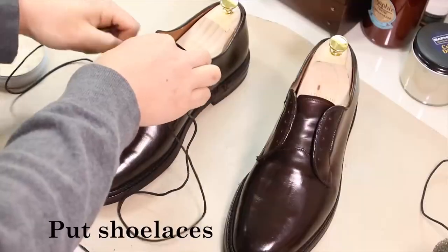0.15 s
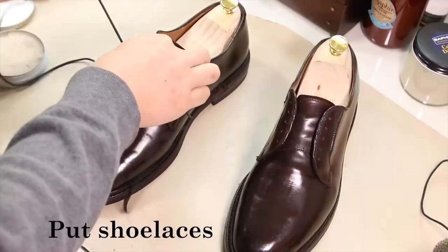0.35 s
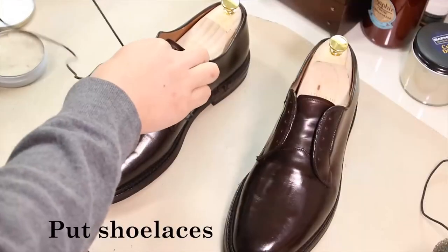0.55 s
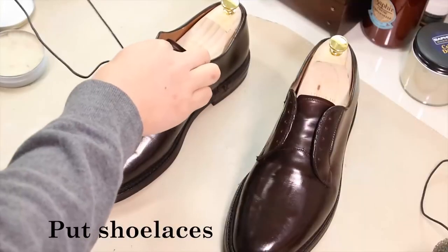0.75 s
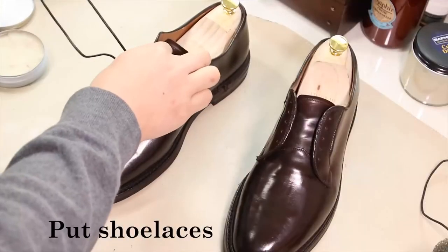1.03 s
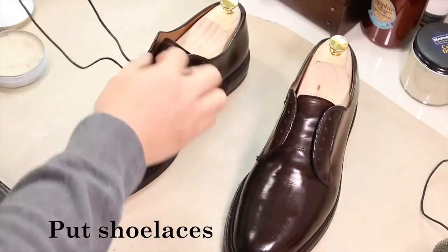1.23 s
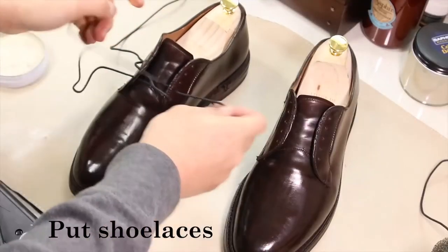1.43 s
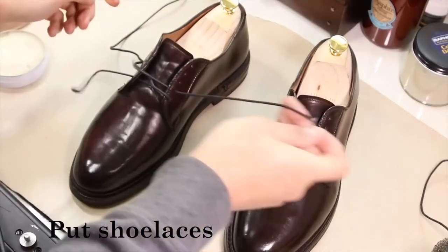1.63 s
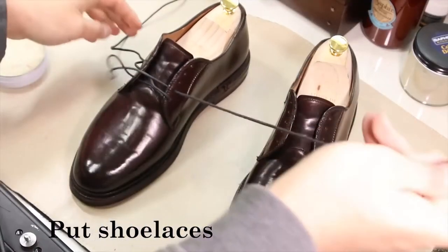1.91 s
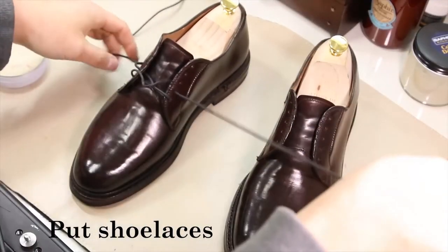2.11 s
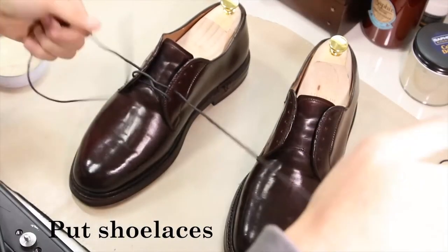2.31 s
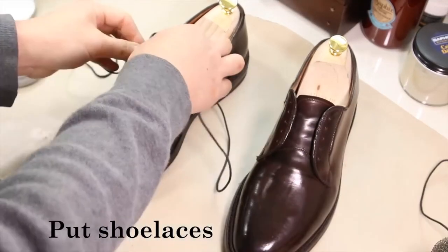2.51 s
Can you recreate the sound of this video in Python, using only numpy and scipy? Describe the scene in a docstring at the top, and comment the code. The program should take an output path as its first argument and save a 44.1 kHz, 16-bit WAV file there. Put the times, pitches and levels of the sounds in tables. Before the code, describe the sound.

A shoelace hisses through the eyelets of a leather shoe in two long pulls.

```python
"""A shoelace drawn through the eyelets of a leather shoe in two long pulls, close to a stereo pair.
The braid hisses over the eyelet's edge and its small slips make the leather ring; now and then it snags.
The hard lace tips tick, and after the second pull the slack lace rustles through the fingers.
The shoe shudders on a table near the microphones, in a small room with a faint steady background."""
import sys
import numpy as np
from scipy import signal
from scipy.fft import rfft, irfft
from scipy.io import wavfile

SR = 44100
rng = np.random.default_rng(int(sys.argv[2]) if len(sys.argv) > 2 else 0)


def generate_wav(sig):
    """Save sig (samples, or channels by samples) to the path in sys.argv[1] as 16-bit PCM at SR."""
    pcm = np.round(np.clip(np.atleast_2d(sig).T, -1, 1) * 32767).astype(np.int16)
    wavfile.write(sys.argv[1], SR, pcm)


N = 116865
T, HZ = np.arange(N) / SR, np.fft.rfftfreq(2 * N, 1 / SR)


def amp(db):
    """Decibels to gain."""
    return 10 ** (np.asarray(db) / 20)


def unit(x):
    """Scales to rms 1."""
    return x / np.sqrt(np.mean(x ** 2) + 1e-20)


def spectrum(points):
    """Spreads a table over all frequencies, on a log axis."""
    hz, value = np.transpose(points)
    return np.interp(np.log(HZ + 1), np.log(hz + 1), value)


def envelope(rows, column=1):
    """One dB column as a gain over time, silent outside the table."""
    rows = np.array(rows)
    return amp(np.interp(T, rows[:, 0], rows[:, column], left=-120, right=-120))


def swell(centre_s, length_s):
    """A smooth bump in time."""
    return np.exp(-(2 * (T - centre_s) / length_s) ** 2)


def causal(db):
    """The response with this gain that rings only after its cause."""
    log_gain = np.log(amp(np.maximum(db, db.max() - 100)))
    cepstrum = irfft(log_gain)
    cepstrum[1:N] *= 2
    cepstrum[N + 1:] = 0
    return np.exp(rfft(cepstrum))


def through(x, response):
    """Filters x by a frequency response."""
    return irfft(rfft(x, 2 * N) * response)[..., :N]


# How alike the two microphones hear the shoe: freq_hz, coherence (0-1)
MIC_LIKENESS = [(500, 0.4), (1400, 0.4), (9000, 0.022)]

def at_mics(pair, side_db, lead_rad=0):
    """Blends two signals into a partly alike stereo pair; side_db is always left minus right."""
    a, b = rfft(pair, 2 * N)
    alike = np.clip(spectrum(MIC_LIKENESS), 0, 1)
    right = alike * a * np.exp(-1j * lead_rad) + np.sqrt(1 - alike ** 2) * b
    return irfft(np.array([a * amp(side_db / 2), right * amp(-side_db / 2)]))[:, :N]


def steady_noise(colour, side_db):
    """Coloured noise at both microphones, rms 1."""
    noise = through(rng.standard_normal((2, N)), amp(spectrum(colour)))
    return unit(at_mics(noise, side_db))


# Colour of the background: freq_hz, level_db
BACKGROUND_COLOUR = [(40, -16.5), (330, -6), (2700, -23.5), (15000, -39.5)]

def background():
    """A faint, dull, even noise behind everything."""
    return amp(-45.5) * steady_noise(BACKGROUND_COLOUR, side_db=2)


def room(x, t60_s=0.22, level_db=-10.5):
    """The short tail of a small room, reaching the microphones 4 ms after the direct sound."""
    t = T[:SR // 2]
    echoes = rng.standard_normal((2, len(t))) * (t > .004) * amp(-60 * t / t60_s)
    return amp(level_db) * signal.fftconvolve(x, echoes / np.linalg.norm(echoes[0]), axes=1)[:, :N]


# Colour of the shoe's shudder on the table: freq_hz, level_db
SHUDDER_COLOUR = [(28, -54), (72, 4), (115, -9), (148, 9.5), (200, -18)]

def table_shudder():
    """The shoe rumbles on the table, following the leather body of each pull and tug."""
    drive = amp(-13.5) * (envelope(FIRST_PULL) + envelope(HAND_TUGS)) + amp(-22.5) * envelope(SECOND_PULL)
    return drive * steady_noise(SHUDDER_COLOUR, side_db=4.5)


# Narrow resonances of the shoe: freq_hz, lift_db
SHOE_MODES = [(2115, 3), (2800, 3.5), (4950, 4.5), (7400, 5.5), (8650, 6)]

def leather(colour, q=17):
    """A broad colour with the shoe's resonances on top, in dB."""
    return spectrum(colour) + sum(db / (1 + (2 * q * (HZ / hz - 1)) ** 2) for hz, db in SHOE_MODES)


def slips(per_s, spread_db=1.8):
    """Tiny releases of the braid at random moments, a few of them large."""
    size = amp(spread_db * np.minimum(rng.exponential(1, N), 4))
    released = rng.random(N) < per_s / SR
    return size * released * rng.choice([-1., 1.], (2, N))


# The lace is taken up between the pulls; the hand lands on the shoe at the end: time_s, level_db
HAND_TUGS = [(1.228, -34), (1.236, -31), (1.272, -26), (1.292, -42.5), (1.325, -65), (1.342, -40.5),
             (1.37, -41.5), (2.6, -60), (2.628, -36.5), (2.65, -65)]
# Slack lace slides through the fingers: time_s, level_db
SLACK_SLIDE = [(2.22, -33), (2.255, -22), (2.285, -37), (2.345, -19.5), (2.39, -27.5), (2.47, -41.5),
               (2.6, -42)]
# Colour of that slide: freq_hz, level_db
SLACK_COLOUR = [(200, -10.5), (600, 0), (1000, -7.5), (2600, -4), (12000, -20.5)]

def handling():
    """Lace, fingers and leather rub lightly, a little left of centre."""
    tugs = at_mics(through(slips(per_s=2500), causal(leather(SECOND_COLOUR))), side_db=2.5)
    slide = at_mics(through(slips(per_s=7800), causal(spectrum(SLACK_COLOUR))), side_db=3.5)
    return envelope(HAND_TUGS) * unit(tugs) + envelope(SLACK_SLIDE) * unit(slide)


# Tips strike or the lace snaps against the eyelet: start_s, ring_db, pitch_hz, crack_db, side_db
TIP_STRIKES = [(0.1231, -11, 1250, -9, 4), (0.8082, -3, 1300, -7.5, 4), (1.2330, -4, 1000, -20, 14),
               (1.8468, -2, 1400, -14, 6), (2.1513, -14, 3800, -17, -1), (2.3005, -21, 7600, -22, 7),
               (2.3695, -10, 2130, -12, 10), (2.467, -16, 2330, -31, 18), (2.597, -29, 7800, -26, 5)]

def lace_tips(crack_s=0.0015, rattle_s=0.007, ring_width_hz=620, low_cut_hz=700):
    """A hard tip lands: a sharp crack in the shoe's resonances, a damped ring and a faint rattle."""
    out = np.zeros((2, N))
    bright_shoe = causal(leather(FIRST_COLOUR) + 3.6 * np.log2(1 + HZ / low_cut_hz))  # 3.6 dB an octave
    for start_s, ring_db, pitch_hz, crack_db, side_db in TIP_STRIKES:
        t = np.maximum(T - start_s, 0)
        ring = np.exp(-np.pi * ring_width_hz * t) * np.sin(2 * np.pi * pitch_hz * t)
        decay = (T >= start_s) * (np.exp(-t / crack_s) + amp(-19) * np.exp(-t / rattle_s))
        crack = through(decay * rng.choice([-1., 1.], (2, N)), bright_shoe)
        out += (amp(ring_db) * ring + amp(crack_db) * crack) * amp([[side_db / 2], [-side_db / 2]])
    return signal.sosfilt(signal.butter(2, low_cut_hz, "high", fs=SR, output="sos"), out)


def taut_lace(start_s=.9, rise_s=.029, pitch_hz=514):
    """The lace comes taut at the end of the first pull, swells into one hollow note and dies away."""
    age = np.maximum(T - start_s, 0) / rise_s
    note = amp(-24) * age * np.exp(1 - age) * np.sin(2 * np.pi * pitch_hz * T)
    return at_mics(np.array([note, note]), spectrum(FIRST_SIDE))


# The leather's lowest strong resonance: time_s, pitch_hz
HOLLOW_PITCH = [(.7, 700), (1.4, 621), (1.73, 723), (1.85, 546)]

def bending_leather(x, width_hz=29):
    """Adds a hollow ring whose pitch shifts as the lace bends the leather."""
    pitch_hz = np.interp(T, *np.transpose(HOLLOW_PITCH))
    carrier = np.exp(2j * np.pi * np.cumsum(pitch_hz) / SR)
    pole = np.exp(-np.pi * width_hz / SR)
    ring = 2 * (carrier * signal.lfilter([1 - pole], [1, -pole], x / carrier)).real
    return x + amp(1.5) * ring


def snagging(snags, shoe, length_s=0.0023, top_hz=5000):
    """The braid catches and jerks free, each time a short, dulled knock in the shoe."""
    jerks = sum(amp(db) * swell(start_s + length_s / 2, length_s) for start_s, db in snags)
    dull_shoe = shoe / np.sqrt(np.mean(abs(shoe) ** 2)) / (1 + 1j * HZ / top_hz)
    return through(jerks * rng.choice([-1., 1.], (2, N)), dull_shoe)


# Friction of the braid, in slips_per_s: body, rasp, hiss
SLIP_RATES = [1200, 1600, 7000]
# The eyelet grips harder for a moment: centre_s, length_s, rasp_rise_db
EYELET_GRIPS = [(0.202, 0.06, 10.5), (0.625, 0.044, 5.5), (0.685, 0.038, 4), (0.772, 0.021, 7),
                (0.912, 0.02, 4.5), (1.442, 0.05, 2), (1.597, 0.063, 4.5), (1.706, 0.043, 4.5),
                (1.959, 0.053, 4), (2.09, 0.053, 3.5)]
# Share of that rise in each band: body, rasp, hiss
GRIP_SHARES = [0.83, 1, 0.96]

def pull(levels, colour, side, lead, snags, body_top_hz=852, rasp_top_hz=1820):
    """Slips and snags in the eyelet excite the leather: a low body, a rasp and the braid's hiss above."""
    shoe, side_db, lead_rad = causal(leather(colour)), spectrum(side), spectrum(lead)
    body, below_hiss = (1 / (1 + (HZ / top) ** 12) for top in (body_top_hz, rasp_top_hz))
    rasp, hiss = below_hiss * (1 - body), 1 - below_hiss
    grip_db = sum(db * swell(centre_s, length_s) for centre_s, length_s, db in EYELET_GRIPS)
    out = np.zeros((2, N))
    for k, band in enumerate([body, rasp, hiss]):
        friction = through(slips(SLIP_RATES[k]), shoe * causal(10 * np.log10(band + 1e-10)))
        rub = at_mics(bending_leather(friction), side_db, lead_rad)
        out += rub / rub.mean(0).std() * envelope(levels, column=k + 1) * amp(GRIP_SHARES[k] * grip_db)
    return out + at_mics(snagging(snags, shoe), side_db, lead_rad)


# Course of each pull, before the grips: time_s, body_db, rasp_db, hiss_db
FIRST_PULL = [(.15, -46.5, -52.5, -47.5), (.26, -40, -34, -32.5), (.37, -29, -24.5, -23),
              (.45, -31, -18, -23.5), (.532, -38, -17, -22.5), (.56, -34.5, -31, -27),
              (.67, -28, -26.5, -25.5), (.88, -33.5, -30.5, -26.5), (.955, -30.5, -31.5, -26),
              (1.1, -56, -53.5, -68)]
SECOND_PULL = [(1.376, -30.5, -35.5, -37), (1.41, -20.5, -25, -29.5), (1.53, -25.5, -30, -30.5),
               (1.9, -25.5, -27.5, -28.5), (2.12, -23.5, -34, -29), (2.29, -30.5, -36.5, -36)]
# Colour of each pull from close by: freq_hz, level_db
FIRST_COLOUR = [(210, -18.5), (340, -6), (510, -4.5), (700, -3.5), (780, -7.5), (1150, -4.5), (1350, 3.5),
                (1760, -9.5), (3100, -10.5), (3620, -3), (5700, -16), (8500, -20), (9300, -23),
                (15500, -27.5)]
SECOND_COLOUR = [(120, -36), (200, -31), (240, -11), (440, -8.5), (575, -2), (702, -1), (842, -13),
                 (1010, -3.5), (1190, -8), (1480, -2.5), (1840, -18), (2450, -19), (3120, -20.5),
                 (4300, -16.5), (9200, -36.5), (15500, -40)]
# Where each pull sits between the microphones: freq_hz, side_db
FIRST_SIDE = [(300, 5), (1100, 10.5), (2400, 3.5), (4500, -0.5), (8000, 8.5)]
SECOND_SIDE = [(450, 4), (620, -1.5), (1000, 9.5), (1600, 6.5), (3000, -5.5), (8000, 0)]
# Phase lead at the left microphone: freq_hz, lead_rad
FIRST_LEAD = [(650, -2), (1100, 1)]
SECOND_LEAD = [(250, 2.9), (600, 0.11), (1000, 0.66)]
# Snags of the braid: start_s, level_db
FIRST_SNAGS = [(.4365, -9), (.5175, -7), (.7612, -10), (.7668, -10), (.7962, -9)]
SECOND_SNAGS = [(1.858, -9), (2.0945, -6), (2.104, -10)]

def lacing():
    """Two long pulls close to the microphones, the first ending with the lace taut."""
    first = pull(FIRST_PULL, FIRST_COLOUR, FIRST_SIDE, FIRST_LEAD, FIRST_SNAGS) + taut_lace()
    return first + pull(SECOND_PULL, SECOND_COLOUR, SECOND_SIDE, SECOND_LEAD, SECOND_SNAGS)


def scene():
    """The lace and hands up close, the table beneath them and the room behind."""
    near = lacing() + handling() + lace_tips()
    return near + room(near) + table_shudder() + background()


def record(dry, low_cut_hz=45, ceiling=.95, top_hz=16000):
    """The recorder cuts the deep bass, rounds peaks near full scale and limits the band."""
    x = signal.sosfilt(signal.butter(2, low_cut_hz, "high", fs=SR, output="sos"), dry)
    x = x / (1 + (x / ceiling) ** 8) ** (1 / 8)
    low_pass = signal.firwin(511, top_hz, window=("kaiser", 9), fs=SR)
    return signal.oaconvolve(x, low_pass[None], "same")


dry = scene()
out = record(dry)
generate_wav(out)
```